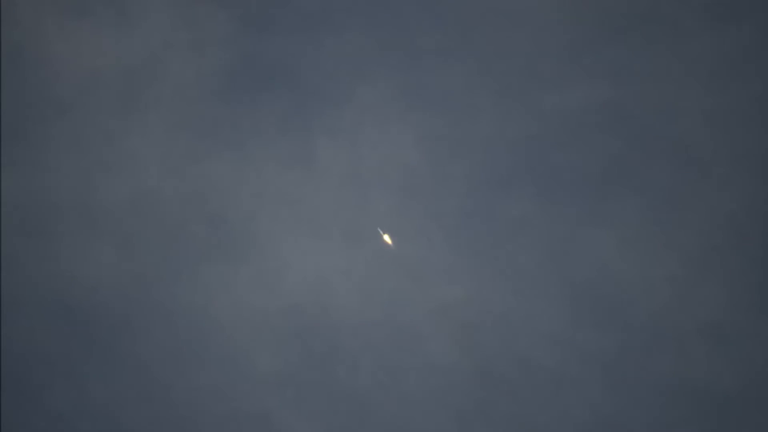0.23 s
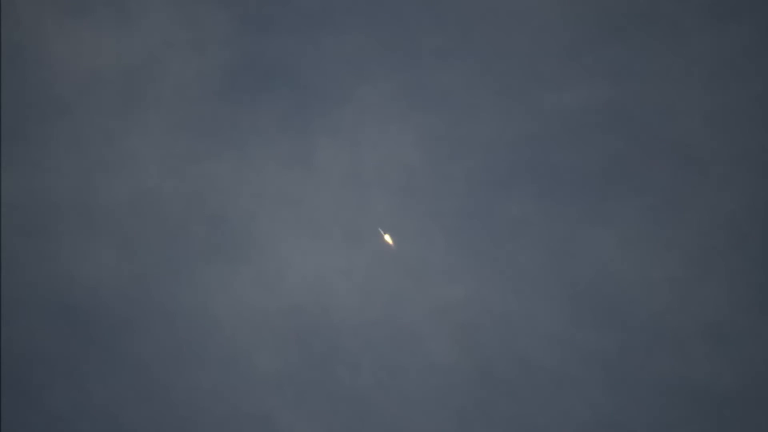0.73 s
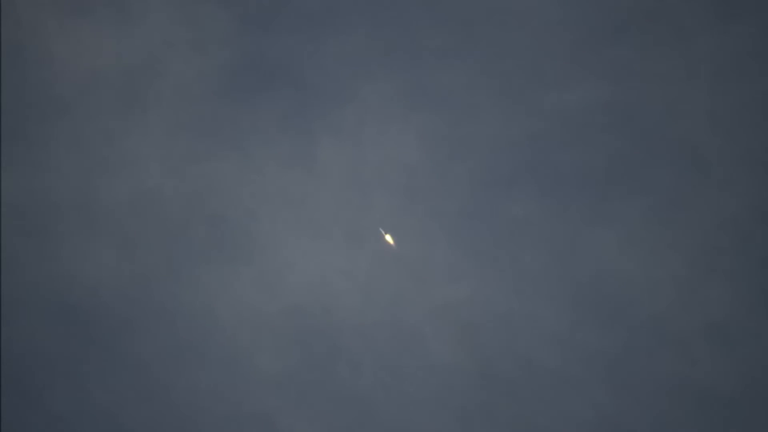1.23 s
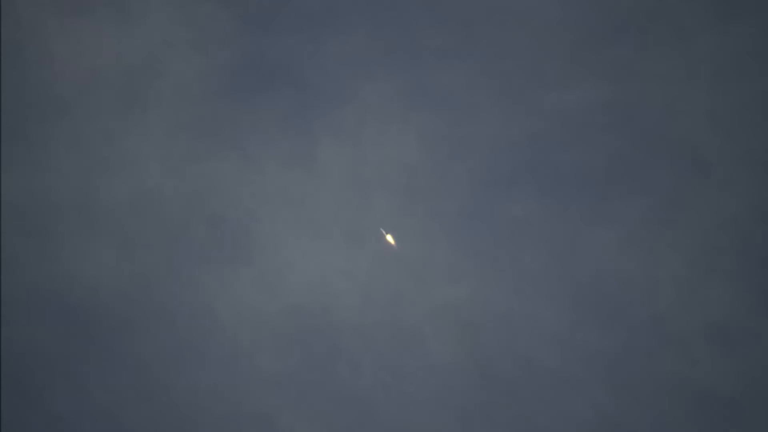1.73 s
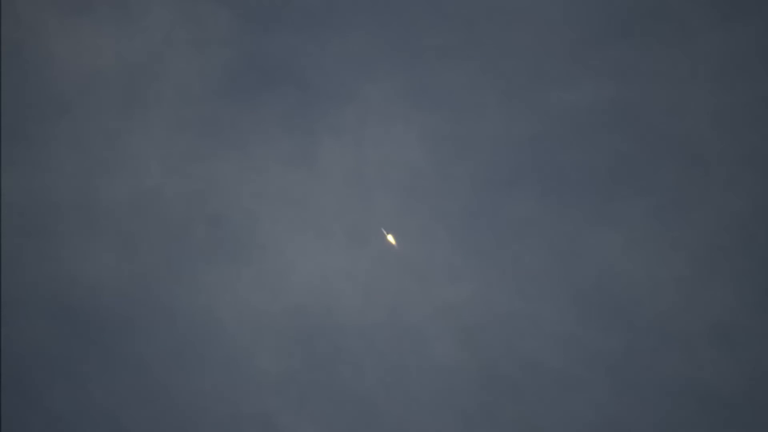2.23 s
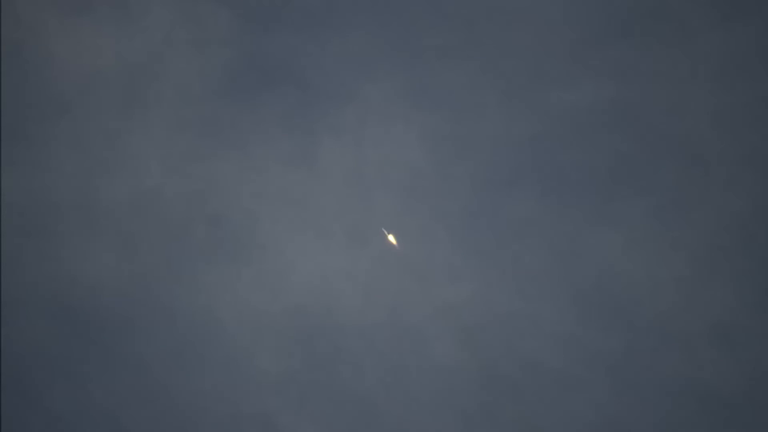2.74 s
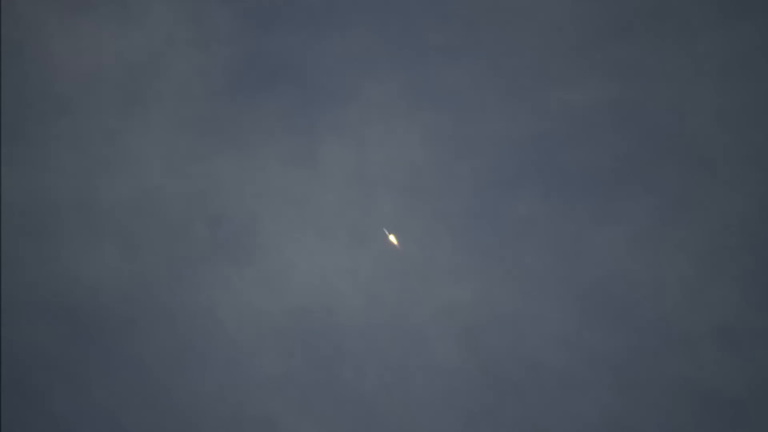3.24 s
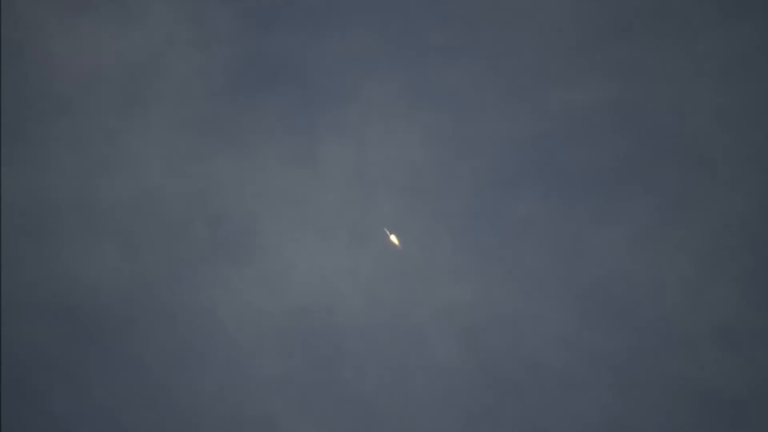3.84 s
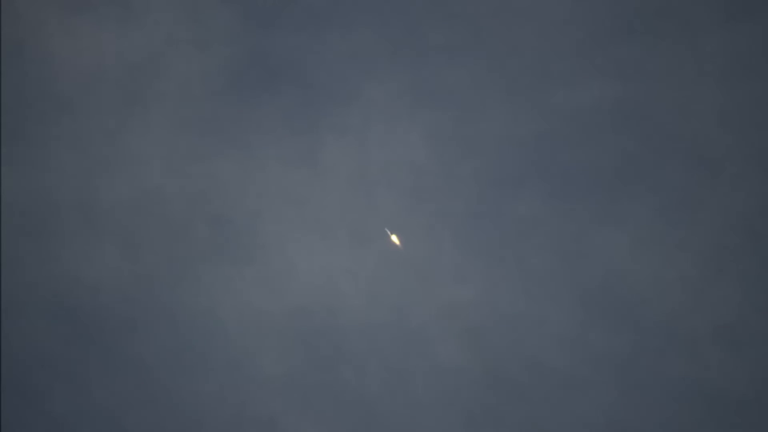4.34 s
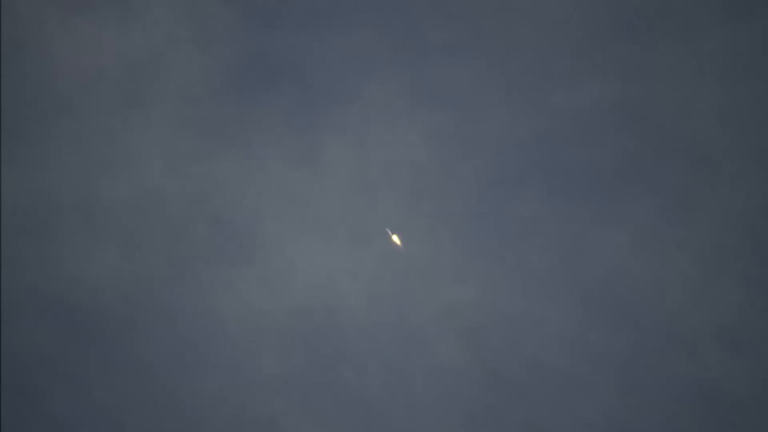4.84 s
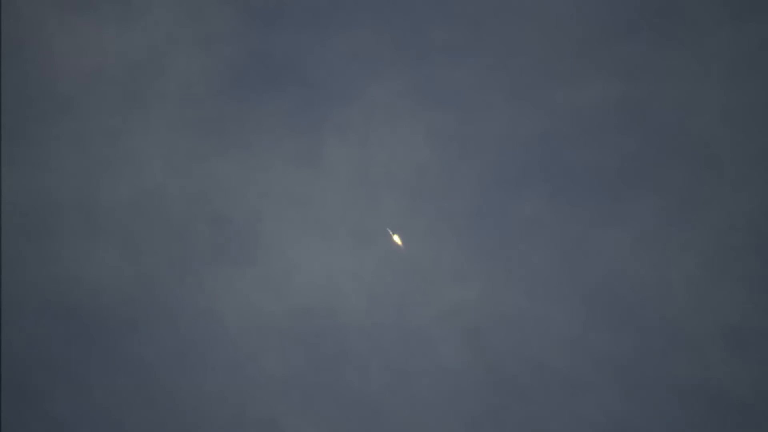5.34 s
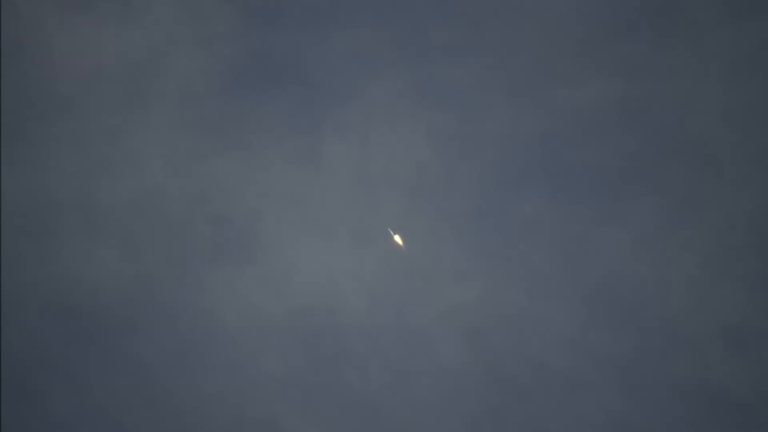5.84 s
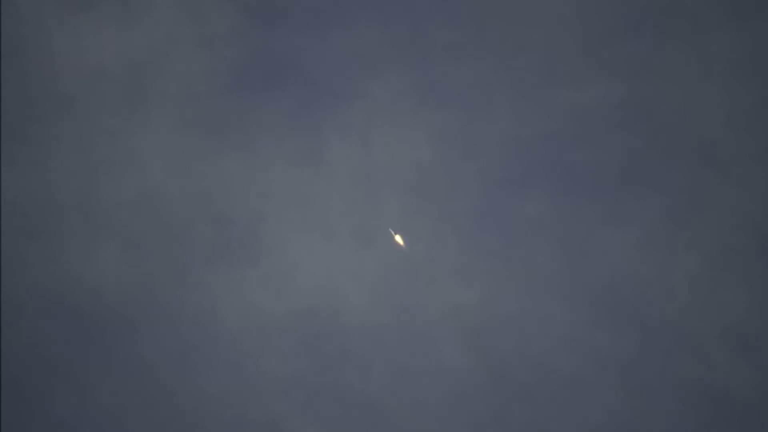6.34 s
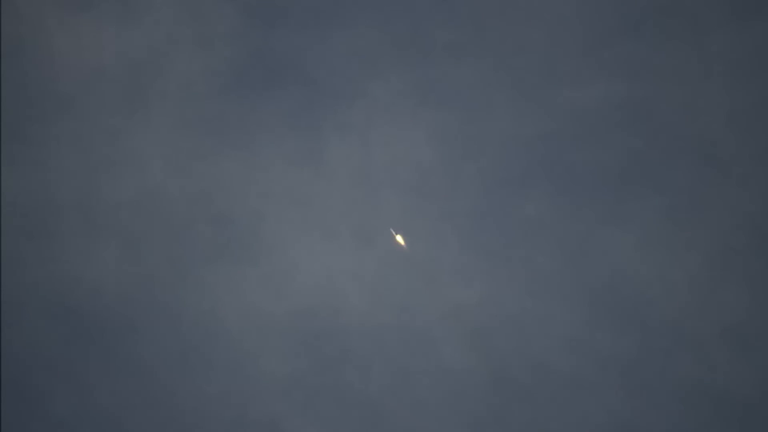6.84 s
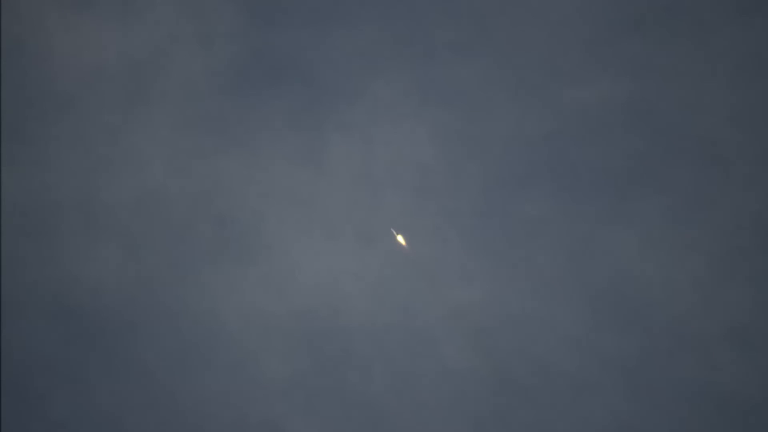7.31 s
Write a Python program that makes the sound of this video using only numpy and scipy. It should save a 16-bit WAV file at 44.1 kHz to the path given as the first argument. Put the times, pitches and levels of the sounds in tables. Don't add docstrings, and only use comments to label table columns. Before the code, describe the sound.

A rocket climbing far away fills the open air with a deep wavering rumble and a hazy rushing roar. Dull, muffled pops give way near three seconds to sharp crackling, fiercest around five seconds. A duller lull follows before the crackle builds again at the end. Stereo microphones stand on open ground, with slight scattered echoes and no close sounds.

```python
import sys
import numpy as np
from scipy import signal
from scipy.fft import rfft, irfft, next_fast_len
from scipy.io import wavfile

SR = 44100
rng = np.random.default_rng(int(sys.argv[2]) if len(sys.argv) > 2 else 0)


def rack_gain(trim_db):
    fader = np.asarray(trim_db, float)
    return 10 ** (fader / 20)


def persist_wave(psi):
    counts = np.round(np.clip(psi, -1, 1) * 32767).astype(np.int16)
    wavfile.write(sys.argv[1], SR, np.atleast_2d(counts).T)


N = 333837

# start_s, delay_ms, unsteadiness_ms
BOUNCE = [(0, 2.3, .35), (1.5, 2.1, .35), (2.4, 1.95, .25), (3.1, 1.98, .18), (3.5, 2.1, .17),
          (3.9, 2.38, .09), (4.7, 2.39, .05), (5.3, 2.38, .05), (5.6, 2.4, .08), (6.3, 2.42, .13),
          (7.57, 2.52, .1)]


def curve_at(rows, times):
    s, *columns = np.transpose(rows)
    return [np.interp(times, s, column) for column in columns]


def in_time(rows):
    return curve_at(rows, np.arange(N) / SR)


def at_hz(points, hz):
    f, v = np.transpose(points)
    return np.interp(np.log(hz + 1), np.log(f + 1), v)


def rms_one(x):
    return x / np.sqrt(np.mean(x ** 2) + 1e-20)


def drift(rate_hz):
    r = np.exp(-2 * np.pi * rate_hz * 40 / SR)
    slow = signal.lfilter([1], [1, -2 * r, r * r], rng.standard_normal(N // 40 + 2002))
    slow = rms_one(slow[2000:])
    return np.interp(np.arange(N) / 40, np.arange(len(slow)), slow)


def butter(x, hz, kind, order=2):
    return signal.sosfilt(signal.butter(order, hz, kind, fs=SR, output="sos"), x)


def coloured(spectrum, channels=1):
    size = next_fast_len(N)
    colour = rack_gain(at_hz(spectrum, np.fft.rfftfreq(size, 1 / SR)))
    noise = rng.standard_normal((channels, size))
    return rms_one(irfft(rfft(noise) * colour, size)[:, :N])


def rumble(level_db):
    # pitch_hz, level_db per Hz
    eddies = [(8.8, -45.5), (15, -17.5), (43, -2.5), (59, 1.5), (86, -3.5), (150, -0.5), (220, -7.5),
              (314, -11.5), (408, -11), (476, -11.5), (600, -21), (780, -48), (1320, -120)]
    return rack_gain(level_db + 2.0 + 0.12 * drift(6.2)) * coloured(eddies)[0]


def rush(level_db):
    # pitch_hz, level_db per Hz
    haze_spectrum = [(290, -37), (500, -5.5), (728, -11), (861, -12), (1290, -20.5), (2830, -46.5),
                     (11000, -78.5), (14300, -105), (22000, -120)]
    shared, left, right = coloured(haze_spectrum, channels=3)
    flicker_db = 1.3 * drift(50)
    return rack_gain(level_db + 3.5 + flicker_db) * (shared + 0.35 * np.array([left, right]))


def bounced(x, share=0.7, blur=8.0):
    delay_ms, unsteady_ms = in_time(BOUNCE)
    late = np.arange(N) - delay_ms * SR / 1000
    echo = np.array([np.interp(late, np.arange(N), channel) for channel in np.atleast_2d(x)])
    gain = share * np.exp(-blur * unsteady_ms)
    return (x + gain * butter(echo, 3000, "low", order=1)) / np.sqrt(1 + gain ** 2)


def front_shape(hz, times, peak_db, loss_db_khz, tick_db, fall_ms, push, early):
    # start_s, return_db from wall and post, lift_db of the middle range,
    # damping of the push (factor), share of the air loss (factor), droop of the tick (dB per kHz)
    sight = [(0, -9, -1, 1.2, 0.9, 1), (.55, -2, 1, 1.06, 1, .1), (2.6, 0.5, 3.5, 1.35, 0.93, -0.5),
             (3.5, 7.5, 2, 1.38, 1.07, 0), (4.2, 1, -0.5, 1.5, 0.94, -0.5), (4.7, -4, 0, 0.85, 0.95, -0.5),
             (5.3, -12.5, -0.5, 1.2, 0.98, -0.3), (5.7, -7, -1, 0.88, 0.96, 0), (6.3, -4, -2, .6, .95, 2),
             (6.8, -7.5, 7, 0.83, 0.94, -1.5), (7.57, -3.5, 3.5, 0.88, 0.78, 1.5)]
    _, lift_db, damping, murk, droop_db = (c[:, None] for c in curve_at(sight, times))
    pushing = front_change(times)[0]
    dip = fall_ms[:, None] / (1 + 2j * np.pi * hz * fall_ms[:, None] / 1000)
    swell = push * pushing * damping / (1 + 1j * hz / 440 * damping - (hz / 440) ** 2)
    tick = rack_gain(tick_db[:, None] - (0.033 * loss_db_khz[:, None] + droop_db) * hz / 1000)
    tick = tick * hz / (hz + 3000)
    air = rack_gain(-np.clip(loss_db_khz, 0, 40)[:, None] * murk * (hz / 1000) ** 0.9)
    octaves_off = np.log2((hz + 1) / 1690)
    air = air * rack_gain(lift_db * np.exp(-(octaves_off / 0.54) ** 2)) + tick
    front = (swell - dip) * 1j * hz / (1j * hz + 90) * air * np.exp(-2j * np.pi * hz * early / SR)
    size = 2 * (len(hz) - 1)
    return front / np.abs(irfft(front, size)).max(1, keepdims=True) * rack_gain(peak_db)[:, None], sight


def front_change(times):
    # start_s, push (factor), dulling of the bounce (dB per kHz), heave (share of the peak)
    change = [(0, 1.1, 0, .3), (2.7, .9, 0, .4), (4.2, .5, 0, .6), (4.7, .3, 0, .4), (5.3, .33, 0, .38),
              (6.2, .8, 1, .45), (7.1, 1.2, 2.5, .45), (7.57, 1.4, 2.5, .45)]
    return [c[:, None] for c in curve_at(change, times)]


def near_bounce(front, hz, times, wobble, strength):
    delay_ms, unsteady_ms = curve_at(BOUNCE, times)
    dulling = front_change(times)[1]
    lag_s = (delay_ms + unsteady_ms * wobble)[:, None] / 1000
    late = np.exp(-2j * np.pi * hz * lag_s)
    again = 0.64 * np.exp(-4.0 * unsteady_ms)[:, None] * late / (1 + (hz / 795) ** 2)
    late = late / (1 - again)
    bounce = rack_gain(-2.5 + 2.0 * strength)[:, None] * (1 + hz / 15000) * rack_gain(-dulling * hz / 1000)
    return front * (1 + bounce * late)


def slow_heave(t, early, times, peak_db, wobble, heave):
    heaving = front_change(times)[2]
    middle_ms, wide_ms, pitch_hz = 3.6, 4.0, 115
    ms = (t - early / SR) * 1000 * np.exp(.15 * wobble)[:, None] - middle_ms
    swing = -np.sin(2 * np.pi * pitch_hz * ms / 1000) * np.exp(-(ms / wide_ms) ** 2)
    swing = swing * np.sin(np.pi / 2 * np.minimum(t * SR / early, 1)) ** 2
    return rfft(heave * heaving * rack_gain(peak_db)[:, None] * swing)


def wall_and_post(front, hz, return_db):
    wall = rack_gain(4.5) / (1 + ((hz - 9500) / 1300) ** 2) * np.exp(-2j * np.pi * hz * .0135)
    post = rack_gain(-1) / (1 + ((hz - 4700) / 600) ** 2) * np.exp(-2j * np.pi * hz * .0095)
    return rack_gain(return_db) * front * (wall + post)


def ragged_tails(hz, t, times, scatter_db):
    # start_s, level_db
    smear = [(0, .5), (2.7, 1), (3.6, 1), (4.4, -1), (5.4, -1.5), (6.0, 3), (6.6, 1), (7.57, 0.5)]
    smear_db, = curve_at(smear, times)
    decay = (rack_gain(-60 * t / .02) + .25 * rack_gain(-60 * t / .1)) * (t > .0003) * (t < .028)
    decay = rms_one(decay) / np.sqrt(len(t))
    noise = rng.standard_normal((len(times), 3, len(t))).astype(np.float32)
    tails = np.moveaxis(rfft(noise * decay), 1, 0) * hz / (hz + 900)
    shared, left, right = tails * rack_gain(scatter_db + smear_db)[:, None]
    return [shared + (0.059 + hz / 13000) * own for own in (left, right)]


def fronts(times, peak_db, loss_db_khz, tick_db, fall_ms, push, scatter_db, heave):
    size, early = 1536, 128
    hz, t = np.fft.rfftfreq(size, 1 / SR), np.arange(size) / SR
    at = np.round(times * SR).astype(int)
    front, sight = front_shape(hz, times, peak_db, loss_db_khz, tick_db, fall_ms, push, early)
    return_db = curve_at(sight, times)[0][:, None]
    wobble, strength = rng.standard_normal((len(at), 2)).T
    pair = near_bounce(front, hz, times, wobble, strength)
    swing = slow_heave(t, early, times, peak_db, wobble, heave)
    clean = pair + wall_and_post(front, hz, return_db) + swing
    paths = [clean] + [pair * tail for tail in ragged_tails(hz, t, times, scatter_db)]
    place = (at[:, None] + np.arange(size)).ravel()
    laid = [np.bincount(place, irfft(path, size).ravel(), N + 2 * size) for path in paths]
    return np.array(laid)[:, early:N + early]


def train(taken_s, count=120):
    # start_s, fronts per second, edge_db relative to the body
    pace = [(0, 3, -54.5), (1.2, 7.3, -49), (2.3, 12, -54.5), (2.8, 6, -50)]
    ends_s, clear_s = 2.78, .008
    per_s, edge_db = in_time(pace)
    shift, size, sharp = rng.standard_normal((count, 3)).T
    turn = np.arange(count) + .5 + .3 * np.clip(shift, -1.5, 1.5)
    at = np.searchsorted(np.cumsum(per_s) / SR, turn)
    nearest_s = np.abs(at[:, None] / SR - taken_s).min(1)
    keep = (at < ends_s * SR) & (nearest_s > clear_s)
    weaker_db = 4 * (np.abs(size) - .5)
    edge_db = edge_db[np.minimum(at, N - 1)] + 0.84 * weaker_db + 3 * np.clip(sharp, -2, .5)
    return np.array([at / SR, -22 - weaker_db, edge_db])[:, keep]


def strong_shocks():
    # start_s, peak_db, edge_db relative to the body
    hazy = [(0.347, -33.5, -37), (0.368, -23.5, -38), (0.441, -22, -35.5), (0.484, -19.5, -29),
            (0.492, -16.5, -32.5), (1.346, -23, -33), (1.384, -14.5, -41.5), (1.395, -18, -41),
            (1.584, -23, -38), (1.62, -17.5, -51), (1.899, -22.5, -36), (2.0, -16, -52.5),
            (2.134, -14.5, -62), (2.179, -19.5, -57.5), (2.38, -14, -25.5), (2.394, -20.5, -27),
            (2.408, -21, -42.5), (2.44, -15, -39), (2.504, -20, -34.5), (2.6, -26, -30),
            (2.618, -15.5, -39.5), (2.707, -18, -50.5)]
    first_burst = [(2.795, -21.5, -16), (2.835, -28, -21), (2.888, -22.5, -13.5), (2.901, -16.5, -2.5),
                   (2.939, -20.5, -3.5), (2.959, -20.5, -19), (2.997, -24, -2.5), (3.048, -35, -5),
                   (3.07, -21, -33), (3.147, -15.5, -28.5), (3.171, -25, -12), (3.248, -21, -13),
                   (3.273, -17, -50), (3.355, -15.5, -37.5), (3.388, -18.5, -19.5), (3.423, -18.5, -63),
                   (3.472, -21, -33), (3.487, -27, -6.5), (3.551, -25.5, -25), (3.559, -21.5, -23),
                   (3.604, -21.5, -31), (3.625, -24, -29), (3.812, -17, -33.5), (3.898, -29.5, -23.5),
                   (3.97, -25, -31), (4.014, -22, -46), (4.05, -23, -32), (4.132, -28.5, -35),
                   (4.274, -27, -16)]
    second_burst = [(4.376, -20.5, -24), (4.628, -23, -28), (4.648, -18, -13.5), (4.683, -22.5, -17),
                    (4.728, -21, -21), (4.768, -16.5, -12.5), (4.7907, -19, -19), (4.828, -16.5, -4),
                    (4.858, -15, 1.5), (4.879, -17.5, -30), (4.899, -15, -18), (4.936, -15, -3),
                    (4.969, -19, -13), (4.993, -16, -16), (4.997, -25.5, 1), (5.034, -14.5, 1.5),
                    (5.042, -28.5, -6), (5.073, -17.5, -15.5), (5.122, -22.5, -4.5), (5.1651, -21, -6.5),
                    (5.1742, -21.5, -15), (5.1969, -19.5, -21.5), (5.221, -23.5, -14), (5.233, -23, -18.5),
                    (5.2608, -19.5, -34), (5.2951, -21.5, -5), (5.382, -16, -24), (5.404, -18, -16),
                    (5.435, -22.5, -12), (5.472, -23, -11.5)]
    late_crackle = [(5.533, -19, -30), (5.566, -24.5, -28), (5.682, -29.5, -24), (5.733, -22.5, -35),
                    (5.793, -19, -25), (5.855, -20.5, -28), (6.083, -22.5, -38), (6.283, -25, -31.5),
                    (6.365, -22.5, -29), (6.415, -23, -25), (6.444, -22, -32), (6.467, -22, -27),
                    (6.504, -21, -28.5), (6.511, -22.5, -37), (6.547, -23, -31), (6.606, -18.5, -57),
                    (6.642, -22, -28.5), (6.778, -22, -27), (6.801, -22, -30), (6.865, -15.5, -45),
                    (6.934, -16.5, -28), (6.989, -20.5, -33), (7.032, -21.5, -20), (7.09, -21.5, -23.5),
                    (7.1595, -26, -10), (7.18, -13.5, -25), (7.1959, -17, -19), (7.299, -16.5, -8.5),
                    (7.328, -18.5, -16), (7.373, -21, -16), (7.457, -17.5, -18)]
    more_shocks = [(4.291, -26, -25), (4.322, -27.5, -25), (4.342, -23.5, -24.5), (4.398, -33, -16),
                   (4.459, -21, -41), (4.47, -27, -17), (4.488, -23, -32), (4.521, -29.5, -10.5),
                   (4.535, -20, -27), (4.556, -28, -13), (4.578, -16.5, -35), (4.594, -19, -33),
                   (4.612, -23.5, -20), (4.8047, -20, -28), (4.911, -19, -17), (4.9541, -22, -17),
                   (5.209, -19.5, -26), (6.659, -37.5, -16.5), (6.732, -23.5, -29.5), (6.761, -20.5, -36),
                   (7.055, -24, -27.5), (7.116, -23, -25), (7.224, -17, -20.5), (7.259, -14.5, -38),
                   (7.418, -17.5, -26), (7.434, -19.5, -19.5), (7.487, -19, -23.5), (7.513, -15, -23.5),
                   (7.523, -15, -17.5), (7.549, -16.5, -14)]
    # start_s, peak_db of the middle range, edge_db relative to it
    early_fill = [(0.1491, -26.5, -46), (0.22, -36.5, -42), (0.305, -27, -39), (0.377, -19, -18),
                  (0.4169, -27.5, -15), (0.532, -24, -24.5), (0.504, -27, -26), (0.515, -27.5, -26.5),
                  (0.263, -29, -28.5), (0.428, -25, -23.5), (0.7335, -39.5, -39), (0.7673, -24.5, -40.5),
                  (0.8859, -26.5, -39), (0.977, -31.5, -39), (1.0254, -31.5, -40.5), (1.1312, -21, -34.5),
                  (1.226, -27.5, -28), (1.3154, -27, -31), (1.4515, -25, -20), (1.5163, -31.5, -31),
                  (1.5584, -36, -31.5), (1.7814, -21.5, -29), (1.8112, -28.5, -24), (1.973, -27, -32.5),
                  (2.0566, -23.5, -34), (2.2273, -20.5, -37.5), (2.284, -38.5, -38), (2.3451, -28.5, -30),
                  (2.574, -31.5, -24), (2.674, -30.5, -34.5), (2.7513, -22.5, -45), (3.0957, -24.5, -34),
                  (3.1223, -21.5, -37), (3.2003, -26, -39), (3.2175, -21, -30), (3.307, -38, -32),
                  (3.3247, -26, -30), (3.4389, -24, -49), (3.51, -23, -29.5), (3.532, -27, -30),
                  (3.6519, -31, -24.5), (3.6708, -28, -28), (3.7033, -25, -33), (3.7236, -27, -30.5),
                  (3.7441, -25.5, -45), (3.7869, -22.5, -42), (3.8387, -38, -38), (3.8593, -27, -36),
                  (3.9377, -29, -22), (4.0735, -32.5, -22), (4.092, -26.5, -24), (4.1631, -30, -33),
                  (4.1872, -27, -30), (4.2364, -29.5, -17)]
    late_fill = [(4.4358, -28, -28), (4.75, -31, -12), (5.0093, -25.5, -15.5), (4.952, -27, -14),
                 (5.083, -25.5, -22), (7.294, -26, -29.5), (5.1037, -26, -23), (5.1415, -23, -29.5),
                 (5.3206, -25.5, -28), (5.337, -23.5, -23), (5.4902, -28.5, -21.5), (5.5022, -28, -25),
                 (5.6098, -27.5, -40), (5.6435, -35.5, -29), (5.7258, -30, -27), (5.7605, -31, -30.5),
                 (5.8157, -24, -19), (5.882, -26.5, -37.5), (5.915, -34, -48), (5.938, -38, -35.5),
                 (5.9778, -24, -27), (5.991, -30.5, -30), (6.0211, -28.5, -36.5), (6.115, -27.5, -36),
                 (6.1894, -27.5, -20), (6.2313, -24, -37), (6.2443, -26, -24), (6.295, -25.5, -28),
                 (6.3133, -27, -22.5), (6.347, -25.5, -25.5), (6.3828, -29, -30), (6.5694, -22.5, -28.5),
                 (6.629, -29.5, -29.5), (6.6869, -25, -37), (6.714, -28, -41.5), (6.8282, -29.5, -38),
                 (6.8418, -23, -31), (6.8727, -26.5, -41), (6.905, -24, -27), (6.9556, -22.5, -39),
                 (7.023, -20.5, -30), (7.0647, -22, -33.5), (7.138, -19.5, -25), (7.2159, -21, -33.5),
                 (7.3428, -20, -22), (7.3941, -24.5, -34), (7.4742, -24.5, -30), (6.0471, -32, -34.5),
                 (6.065, -34.5, -42), (6.136, -29.5, -39), (6.152, -32, -41), (6.166, -32, -38),
                 (6.208, -29.5, -26), (6.221, -30, -32), (6.265, -33, -37), (4.85, -27.5, -25),
                 (5.267, -27.5, -23), (5.359, -28, -26), (6.495, -28, -34), (6.584, -32, -38),
                 (7.242, -32, -35)]
    crackle = np.concatenate([hazy, first_burst, second_burst, late_crackle, more_shocks])
    fill = np.concatenate([early_fill, late_fill]) + [0, 3.5, -14.5]
    listed = np.concatenate([crackle, fill]).T
    s, peak_db, edge_db = np.hstack([listed, train(listed[0])])
    fall_ms = .3 * np.exp(0.42 * rng.standard_normal(len(s)))
    arrival_s, loss_db_khz = s + .0006, 6.0 - 0.27 * (edge_db + 18.0)
    return fronts(arrival_s, peak_db + 8, loss_db_khz, edge_db - 13.5, fall_ms,
                  push=0.58, scatter_db=1.8, heave=0.86)


def small_shocks(level_db, haze, count=1200):
    when, size, spread, length, steep = rng.random((count, 5)).T
    at = (when * (N - 1)).astype(int)
    peak_db = level_db[at] + 0.5 - 1.0 * np.log(size + 0.055)
    tick_db = -38 - 1.5 * haze[at] - 2 * np.log(steep + 1e-2)
    loss_db_khz, fall_ms = haze[at] * (0.92 + .5 * spread), 0.24 + 0.62 * length
    return fronts(at / SR, peak_db, loss_db_khz, tick_db, fall_ms, push=0.43, scatter_db=-1.0, heave=.5)


def ticks():
    # start_s, peak_db
    thin_fronts = [(0.1281, -62), (0.2753, -51), (0.455, -49), (0.62, -49), (0.7093, -54), (0.8323, -47),
                   (0.9505, -48), (1.081, -49), (1.0892, -41.5), (1.1189, -49), (1.1697, -47),
                   (1.282, -47.5), (1.3463, -48), (1.3843, -50), (1.421, -48.5), (1.5295, -48.5),
                   (1.592, -43.5), (1.699, -47), (1.7423, -46), (1.7804, -54), (1.8108, -48),
                   (2.0702, -55.5), (2.253, -53), (2.3825, -56), (2.4907, -47), (2.6454, -43),
                   (2.7033, -50), (3.228, -48), (3.306, -44), (3.545, -40)]
    s, peak_db = np.transpose(thin_fronts)
    clicks = np.bincount(np.round(s * SR).astype(int), rack_gain(peak_db + 20.0), N)[:N]
    return butter(butter(-clicks, 1500, "high"), 5000, "low")


def surroundings(x, t60, level_db, low_hz):
    t = np.arange(int(SR * .3)) / SR
    tails = butter(rng.standard_normal((2, len(t))) * rack_gain(-60 * t / t60), low_hz, "high", order=1)
    tails = tails / np.sqrt(np.sum(tails ** 2, 1, keepdims=True))
    return rack_gain(level_db) * signal.fftconvolve(x[None], tails, axes=1)[:, :N]


def microphone_pair(x):
    # pitch_hz, lead of the left port in radians
    lead = [(25, -.3), (60, -0.35), (125, -.55), (260, -0.51), (780, -0.33), (3620, 0.74), (10500, 0.0),
            (11600, 0.14)]
    # pitch_hz, level_db of left minus right
    tilt = [(60, 0.5), (170, -0.3), (490, -1), (1400, -2), (4010, -1.5), (11500, 0)]
    size = next_fast_len(N + 2048)
    hz = np.fft.rfftfreq(size, 1 / SR)
    half = np.exp(.5j * at_hz(lead, hz)) * rack_gain(at_hz(tilt, hz) / 2)
    return irfft(rfft(x, size) * np.array([half, 1 / half]), size)[:, :N]


def resonance(x, hz, wide_hz):
    r = np.exp(-np.pi * wide_hz / SR)
    rise = np.array([1, 0, -1]) * (1 - r * r) / 2
    return signal.lfilter(rise, [1, -2 * r * np.cos(2 * np.pi * hz / SR), r * r], x)


def ground(x):
    # start_s, ring (gain), dip (depth 0-1)
    ground_effect = [(0, 0.063, 0.03), (3.8, .05, 0.04), (4.4, 0.075, 0), (5.6, 0.23, 0), (6.2, 0.66, 0.6),
                     (6.7, 0.37, 0.6), (7.0, 0.13, 0.4), (7.57, 0.11, 0)]
    ring, dip = in_time(ground_effect)
    return x + ring * resonance(x, 403, 68.6) - dip * resonance(x, 647, 110)


def scene():
    # start_s, rumble_db, haze (dB lost per kHz), rush_db
    plume = [(0.0, -25, 28.5, -34.5), (0.06, -21, 13, -34), (0.3, -23, 12, -35.5),
             (0.47, -19.5, 7.5, -28.5), (0.58, -18.5, 17.5, -35.5), (0.69, -20.5, 19, -36),
             (1.18, -18.5, 20.5, -31.5), (2.46, -19, 19, -31.5), (2.57, -17.5, 15.5, -36),
             (2.78, -22, 16, -42), (2.95, -22, 9.5, -37.5), (4.28, -20, 8.5, -37), (5.0, -24.5, 6.5, -47),
             (5.46, -24.5, 7.5, -41), (5.94, -25, 16, -39), (7.19, -22, 5.5, -43.5), (7.57, -22, 6, -38)]
    # start_s, level_db
    swarm = [(0, -24), (2.3, -20.5), (2.9, -22.5), (3.8, -30), (5.6, -28), (6.2, -27), (6.9, -29),
             (7.57, -27.5)]
    rumble_db, haze, rush_db = in_time(plume)
    small_db, = in_time(swarm)
    shocks = strong_shocks() + small_shocks(small_db, haze)
    direct = shocks[0] + ticks() + bounced(rumble(rumble_db), share=0.59, blur=6.2)[0]
    echoes = surroundings(direct, t60=0.44, level_db=-12, low_hz=124)
    afterglow = surroundings(butter(shocks[0], 1700, "high"), t60=0.87, level_db=-8.0, low_hz=3000)
    near = microphone_pair(direct) + shocks[1:] + echoes + afterglow + bounced(rush(rush_db))
    rasp = surroundings(butter(shocks[0], 610, "high"), t60=0.11, level_db=-9.5, low_hz=900)
    return ground(near + rasp)


def band_limit(x):
    return signal.sosfilt(signal.butter(12, 12080, fs=SR, output="sos"), x)


def record(dry):
    fall_db = 122.0 * np.arange(N) / SR
    over_db = np.maximum(20 * np.log10(np.abs(dry).max(0) + 1e-9) + 12, 0)
    held_db = np.maximum.accumulate(over_db + fall_db) - fall_db
    gain = rack_gain(-.7 * signal.lfilter([.05], [1, -.95], np.maximum(held_db, 0)))
    opening = np.minimum(.4 + np.arange(N) / (.003 * SR), 1)
    x = dry * gain * opening
    knee = .31
    x = x - 0.42 * (x - np.clip(x, -knee, knee))
    x = x + rack_gain(-90.5) * butter(rng.standard_normal((2, N)), 9000, "low")
    x = signal.sosfilt(signal.cheby1(12, 1, 10900, fs=SR, output="sos"), x)
    return band_limit(x)


dry = scene()
out = record(dry)
persist_wave(out)
```